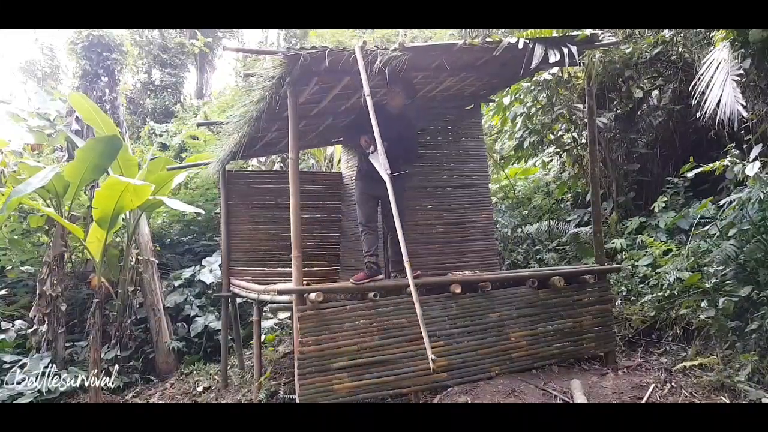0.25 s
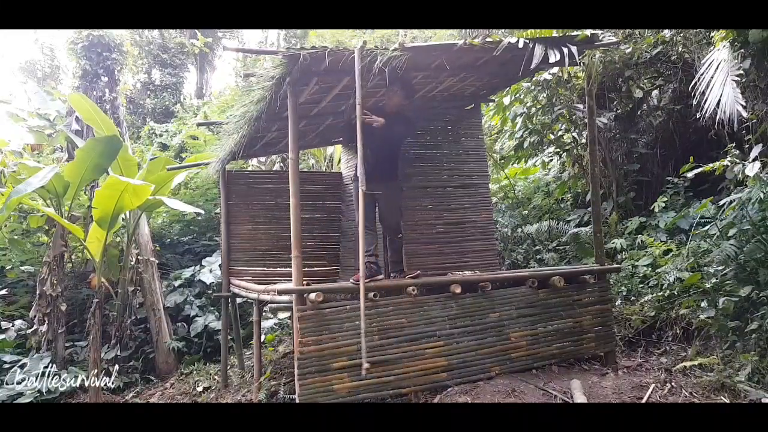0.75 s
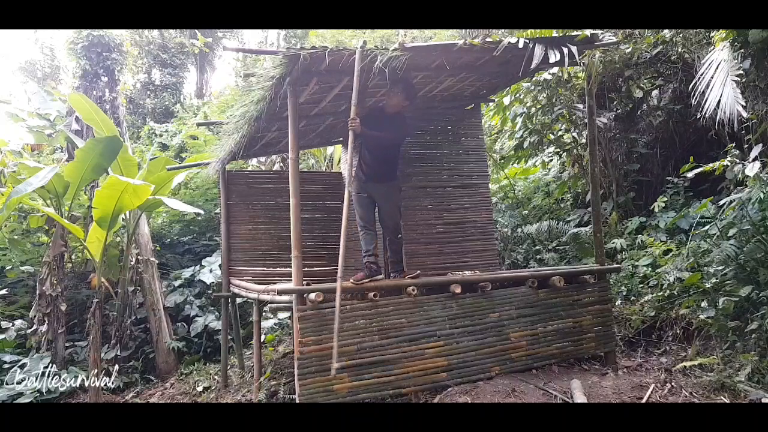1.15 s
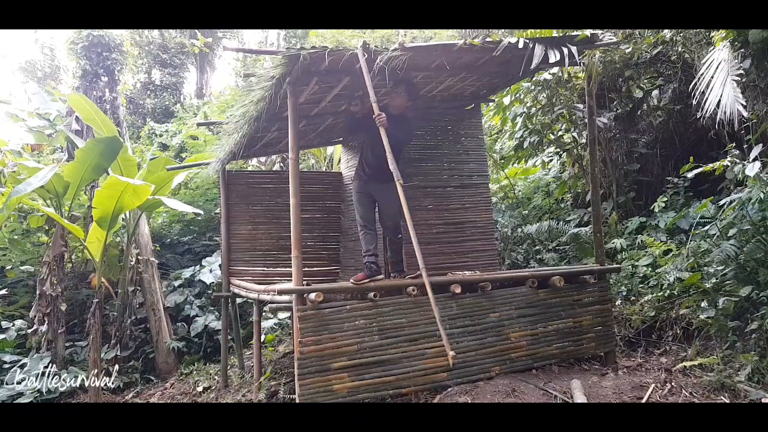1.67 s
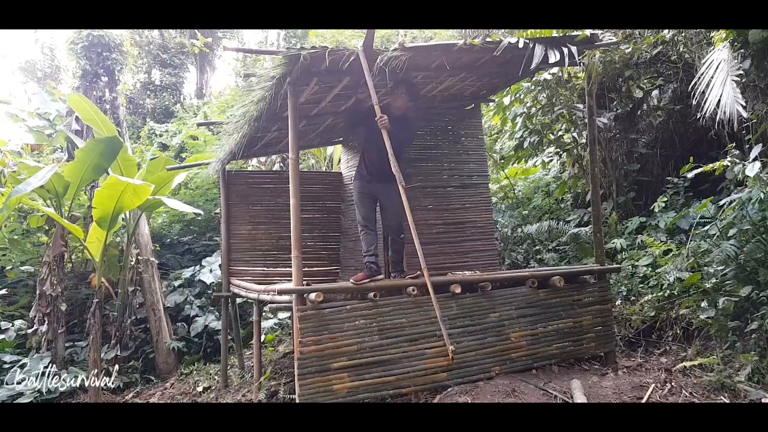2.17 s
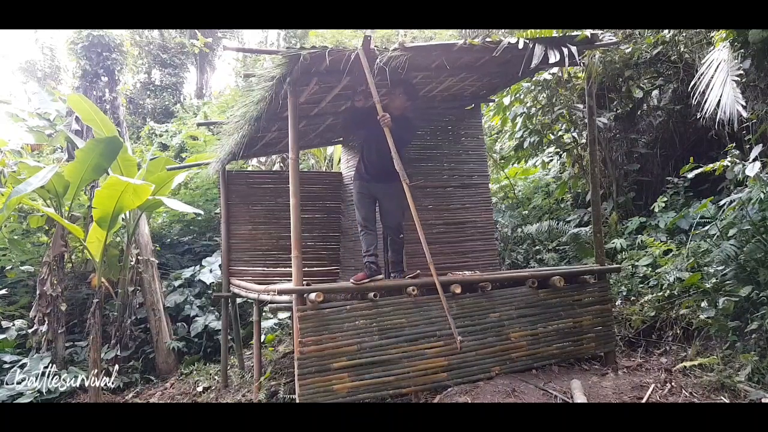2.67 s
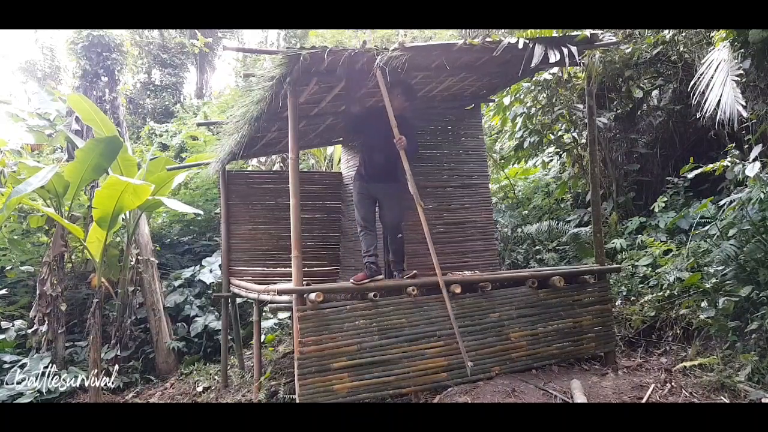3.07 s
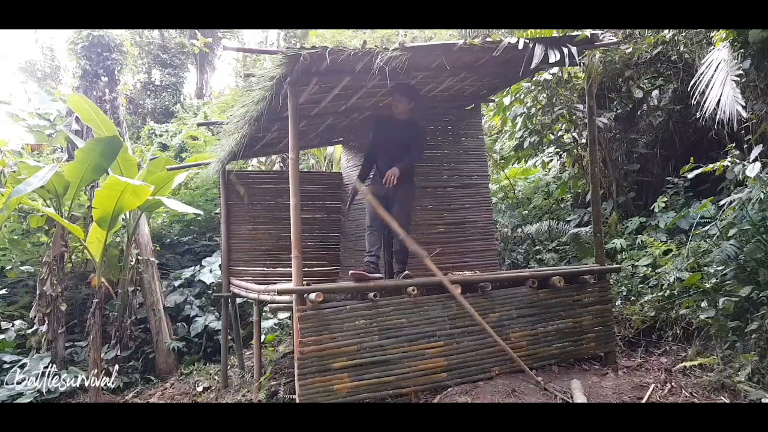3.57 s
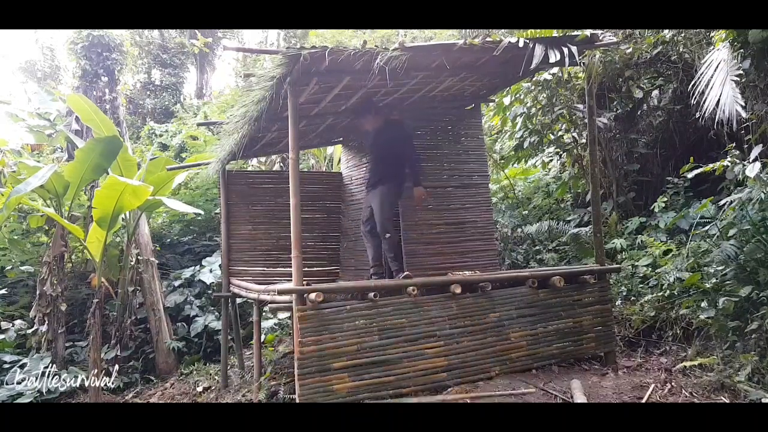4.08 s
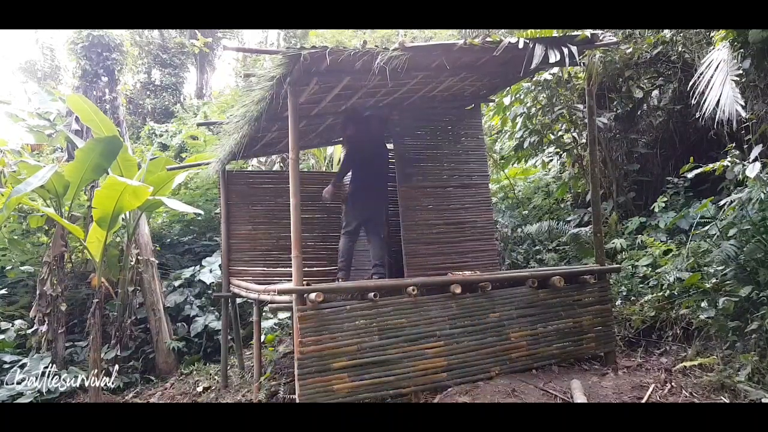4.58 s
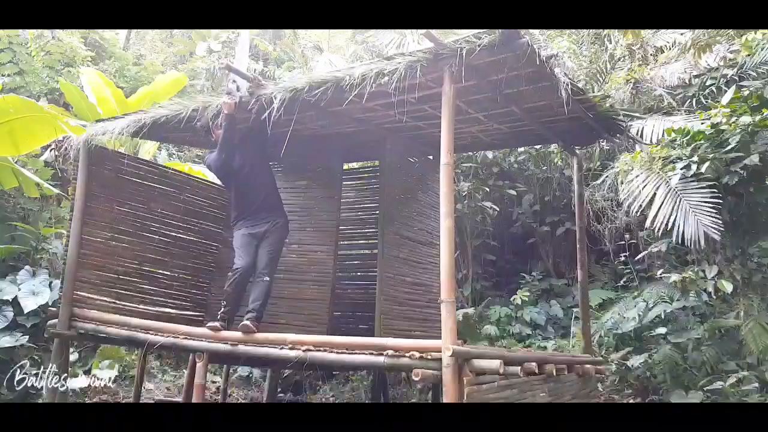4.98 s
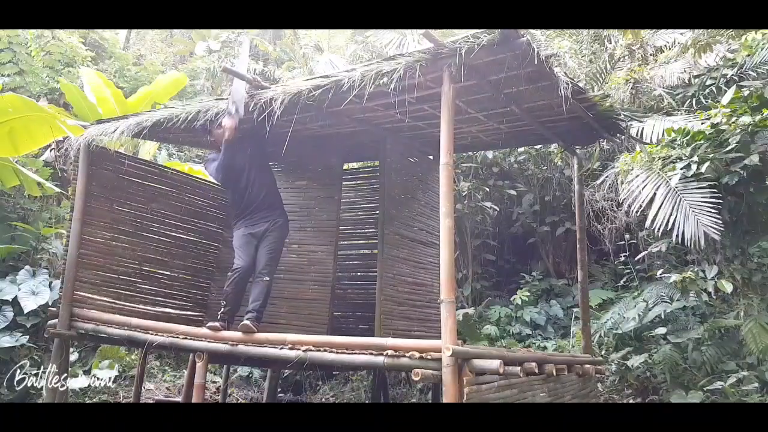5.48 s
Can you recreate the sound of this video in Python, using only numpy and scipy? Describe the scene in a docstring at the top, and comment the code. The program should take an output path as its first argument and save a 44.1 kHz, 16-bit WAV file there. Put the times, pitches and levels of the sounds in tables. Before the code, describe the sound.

Faint scrapes of a bamboo pole, then a loud clattering crack as it drops, followed by slat knocks, creaks and soft shuffling steps in a forest.

```python
"""A bamboo hut in a forest: a person scrapes a long pole along the wall, lets it fall and steps on slats.
Blows and rubbing are shaped noise forced through the resonances of the canes, with decaying modes on blows.
Lashings creak by stick-slip, fibres snap as short clicks, hollow canes hoot and low tones thump dully.
Filtered noise makes the air, a far drone and the insects; birds are falling whistles over a far flock.
Decaying noise is the trees' short echo of all but the thumps and the forest."""
import sys
import numpy as np
from scipy import signal
from scipy.fft import rfft, irfft, next_fast_len
from scipy.io import wavfile
from scipy.ndimage import uniform_filter1d, map_coordinates

SR = 44100
rng = np.random.default_rng(int(sys.argv[2]) if len(sys.argv) > 2 else 0)


def int16_out(signal):
    """Quantize to a 16-bit WAV file."""
    q = np.round(np.clip(np.atleast_2d(signal).T, -1, 1) * 32767)
    wavfile.write(sys.argv[1], SR, q.astype(np.int16))


N = 253134
T = np.arange(N) / SR

# Levels are in dB; some sources add a trim or balance to theirs.
# air of the forest: (frequency [Hz], level per Hz [dB])
AIR_SPECTRUM = [(20, -5), (45, 3), (95, -1), (200, -10), (440, -12.5), (1200, -14.5), (3300, -12.5),
                (4600, -9.5), (5300, -10.5), (6500, -8.5), (8100, -17.5), (14400, -16.5), (16000, -46)]
# insect chorus: (frequency [Hz], level per Hz [dB])
CHORUS_SPECTRUM = [(2060, -45), (3500, -42), (3910, -5.5), (4160, -3), (4500, -7), (5000, 5.5), (5330, 11),
                   (5650, -2), (6130, 0), (6560, 3), (7500, -80), (9750, -58), (16500, -120)]
# a lower insect: (time [s], level [dB])
TRILL_LEVEL = [(0, -105), (1.35, -78.5), (1.45, -75), (2.1, -66), (2.4, -69.5), (3.1, -72), (3.4, -89),
               (5.7, -57)]
# a higher insect: (time [s], level [dB])
WHINE_LEVEL = [(0, -109), (.5, -83), (1.15, -75), (1.3, -87), (1.8, -76.5), (3.3, -82), (3.9, -74.5),
               (5.7, -83)]
# a faint far drone: (time [s], level [dB])
DRONE_LEVEL = [(0, -72.5), (.7, -80.5), (1.1, -76), (1.5, -87.5), (5.7, -73)]
# a bird's falling chips: (time [s], level [dB])
CHIPS = [(.338, -54.5), (.402, -58.5), (.965, -57), (1.485, -54), (1.525, -51), (2.733, -49),
         (3.851, -55.5)]
# a farther bird twitters down the scale: (start [s], length [s], mean first pitch [Hz], level [dB])
TWITTERS = [(.15, 0.23, 5800, -70), (1.15, .25, 5920, -65.5), (1.655, 0.22, 5760, -61.5),
            (3.273, 0.12, 5360, -66)]
# echo of the trees: (frequency [Hz], t60 [s])
TREE_DECAY = [(100, 0.74), (500, 0.5), (2500, 0.52), (6000, 0.64), (14000, 0.59)]
# likeness of left and right: (frequency [Hz], correlation [-1 to 1])
EAR_LIKENESS = [(40, 0.32), (150, 1), (450, 0.89), (1000, 0.59), (2100, 0.33), (4500, 0.065),
                (10000, -0.017)]

# the pole strikes: (time [s], body [dB], clack [dB], splinter [dB], clatter t60 [s])
POLE_STRIKES = [(.738, -80, -83, -74, 0.38), (1.014, -55.5, -42, -40, 0.14), (1.025, -53.5, -48, -48, 0.25),
                (1.939, -67, -56, -52, 0.094), (1.955, -71, -58, -61, 0.23), (2.373, -56, -40, -36.5, 0.14),
                (2.444, -51, -42, -50, 0.14), (2.623, -56, -48.5, -39.5, 0.53),
                (2.783, -66, -46, -32, 0.11), (4.006, -39, -37, -37, 0.16),
                (4.0225, -13, -21.5, -22.5, 0.084), (4.032, -25.5, -14, -15.5, 0.094),
                (4.041, -29.5, -28.5, -21.5, 0.28)]
# slats knock on the joists: (time [s], body [dB], clack [dB], splinter [dB], clatter t60 [s])
SLAT_KNOCKS = [(4.6515, -25.5, -25, -20, 0.24), (4.6555, -22.5, -13.5, -39, 0.061),
               (4.668, -20, -22, -31, 0.14), (4.8445, -21.5, -26, -29.5, 0.1),
               (4.9595, -67, -58, -34, 0.047), (4.973, -26.5, -23.5, -54, 0.032),
               (5.016, -30, -41, -58, 0.22)]
# feet land on the sagging floor: (time [s], body [dB], clack [dB], splinter [dB], clatter t60 [s])
STEPS = [(5.137, -32, -40, -39, 0.12), (5.243, -59, -32.5, -45, 0.14), (5.345, -30.5, -54, -49, 0.1),
         (5.372, -48, -56, -58, 0.059), (5.415, -33.5, -39, -46, 0.38), (5.608, -35, -33, -48, 0.094),
         (5.728, -38, -43, -51, 0.18)]
# strokes of the pole along the wall: (start [s], length [s], body [dB], clack [dB], splinter [dB])
SCRAPES = [(.742, 0.024, -69, -57.5, -68), (1.715, 0.034, -63, -59, -80),
           (1.955, 0.044, -34.5, -38.5, -45.5), (2.015, 0.023, -31.5, -36.5, -40.5),
           (2.226, 0.0085, -54, -48.5, -64), (2.27, .06, -61, -53, -61), (2.38, 0.061, -39.5, -42.5, -48.5),
           (2.627, 0.036, -55.5, -51, -53), (2.79, 0.036, -27, -30.5, -36.5),
           (2.925, 0.0083, -44.5, -59, -73), (3.17, 0.063, -72, -72.5, -61.5),
           (3.59, 0.014, -69, -61, -58.5)]
# slats rub under the feet: (start [s], length [s], body [dB], clack [dB], splinter [dB])
SHUFFLES = [(4.456, 0.0042, -76, -49, -53), (4.49, .13, -69, -82, -65), (4.87, 0.11, -56.5, -46.5, -47.5),
            (5.112, 0.019, -39, -39, -44), (5.18, 0.1, -42, -41.5, -41.5), (5.29, 0.068, -41.5, -43.5, -47),
            (5.497, 0.093, -40.5, -37.5, -32), (5.6, 0.055, -43, -42, -74)]
# the air in a hollow cane rings: (time [s], pitch [Hz], level [dB], t60 [s])
HOLLOW_TONES = [(.762, 598, -51, .36), (.742, 1170, -65, .4), (1.295, 330, -65, .2), (2.665, 590, -40, .26),
                (2.668, 760, -46, .2), (2.93, 470, -54, .75), (4.846, 388, -29, .09),
                (5.019, 425, -29, .11)]
# dull low thumps: (time [s], level [dB], left minus right [dB])
THUMPS = [(1.146, -59, 29), (2.421, -56.5, 11), (2.546, -71, 7), (2.802, -50, 7), (3.149, -58.5, 20),
          (3.448, -63, 22), (3.583, -59, 16.5), (3.832, -65.5, 17), (4.039, -52.5, 2), (4.651, -57.5, 2),
          (5.104, -49.5, -1), (5.332, -47, 0), (5.45, -64, -5)]
# dry fibres snap: (time [s], peak level [dB])
SNAPS = [(4.033, -10), (4.0405, -10), (4.6515, -14), (4.8453, -14.5), (4.904, -26), (4.9598, -19.5),
         (5.1125, -26), (5.486, -30), (5.4945, -23), (5.5005, -24)]
# a lashing creaks in a run of slips: (start [s], length [s], first peak [dB], last peak [dB])
CREAKS = [(4.121, 0.059, -23.5, -15.5), (4.217, .015, -27.5, -25), (4.286, .08, -34, -32.5),
          (4.414, 0.047, -42.5, -30.5), (4.498, .14, -32, -35), (4.75, .015, -35, -30),
          (4.921, .015, -32, -39), (4.968, .015, -24, -23)]

# ringing modes of the pole: (frequency [Hz], level [dB], t60 [s])
POLE_MODES = [(380, -8, .45), (510, -1, .35), (604, 3, .16), (684, -10, .2), (985, 1, .12), (1155, 2, .16),
              (1305, 0, .18), (1790, -9, .2), (2210, -13, .3), (2325, -9, .28), (3460, -15, .22)]
# ringing modes of the slats: (frequency [Hz], level [dB], t60 [s])
SLAT_MODES = [(260.6, -22.5, 0.6), (396, -13.5, 0.24), (503, -18, 0.18), (737, -20, 0.14),
              (839, -15.5, 0.18), (1001, -8.5, 0.11), (1237, -16, 0.097), (1220, -21, 0.067),
              (1440, -28, 0.13), (1497, -1, 0.039), (1590, -11.5, 0.12), (2320, -36, 0.16),
              (2260, -36, 0.12), (2670, -41, 0.15), (3120, -29, 0.4), (3400, -21, 0.22)]
# ringing modes of the sagging floor: (frequency [Hz], level [dB], t60 [s])
FLOOR_MODES = [(204, -0.5, 0.09), (237, 0, 0.09), (417, -0.5, 0.061)]
# broad resonances of the pole: (frequency [Hz], width [Hz], level [dB])
POLE_BODY = [(234, 360, -22.5), (332, 66, -10), (498, 70, -5), (644, 44, -20), (702, 30, -1),
             (1000, 300, 0.5), (1100, 87, 1), (1490, 100, 2.5), (1766, 35, 4.5), (1940, 120, -1),
             (2444, 194, 3)]
# broad resonances of the slats: (frequency [Hz], width [Hz], level [dB])
SLAT_BODY = [(340, 76, -15), (508, 24, -4), (690, 79, -12.5), (810, 21, -0.5), (918, 47, 1.5),
             (1160, 22, 4), (1410, 70, -0.5), (1960, 54, -2.5), (2133, 130, -3), (2420, 110, -5)]
# broad resonances of the wall: (frequency [Hz], width [Hz], level [dB])
WALL_BODY = [(178, 290, -3.5), (263, 23, 5.5), (328, 15, 8.5), (428, 9.1, 9), (590, 12, 1.5),
             (810, 17, 12.5), (1060, 330, 3.5), (1260, 200, 7.5), (1800, 1100, 6.5), (2190, 200, 7.5)]
# broad resonances of the floor: (frequency [Hz], width [Hz], level [dB])
FLOOR_BODY = [(137, 100, -2), (213, 44, 3.5), (404, 35, 3), (574, 45, -1), (800, 65, 3), (1130, 510, 1.5),
              (1510, 310, -2), (1920, 460, 1), (2320, 88, 5.5), (3330, 710, -2)]
# treble of pole and slat blows: (frequency [Hz], level per Hz [dB])
CRACK_SPECTRUM = [(1470, -25), (2500, 7), (3080, -3), (3830, -2.5), (7950, -11), (10300, -9.5),
                  (12100, -12.5), (14700, -17), (16000, -32)]
# treble of the pole on the wall: (frequency [Hz], level per Hz [dB])
WALL_RASP = [(1470, -5), (2500, 3.5), (3330, -8), (3690, -5), (6600, -9), (8080, -14), (11000, -7.5),
             (14900, -12.5), (16000, -6.5)]
# treble of steps and rubbing on the floor: (frequency [Hz], level per Hz [dB])
FLOOR_RASP = [(1470, -37), (2500, -8), (3770, -4.5), (4620, -1.5), (6860, -2.5), (9890, -9.5), (10800, -3),
              (12600, -6), (14800, -6.5), (16000, -3.5)]
# flutter within a thump: (frequency [Hz], level per Hz [dB])
FLUTTER_SPECTRUM = [(20, -10), (50, 14), (110, -1), (200, -21.5), (400, -25.5), (1000, -70), (3000, -120)]
# a snapping fibre: (frequency [Hz], level per Hz [dB])
SNAP_SPECTRUM = [(500, -3.5), (2000, -7), (5000, -6.5), (9000, -8.5), (14000, -4), (16000, -7)]
# the tick of a lashing: (frequency [Hz], level per Hz [dB])
TICK_SPECTRUM = [(300, -8.5), (900, -8.5), (1600, 2.5), (2500, 2.5), (3600, -5.5), (6000, -15), (9000, -22),
                 (15000, -20)]

BODY_HZ, CLACK_HZ = 700, 3000  # upper edges of the body and clack bands
BODY_LAG_S = 0.014  # the heavy frame answers a stroke later than the surface does
SLIP_S, AFTERSLIP_DB = 0.033, -11  # one slip to the next; the weaker slip halfway between two
REBOUND_S, REBOUND_DB = 0.061, -7  # each thump comes again, softer
CHIP_FROM_HZ, CHIP_TO_HZ = 5620, 4770
TWITTER_FALL_HZ_PER_S = 2110
TOP_HZ = 15750  # band limit of the whole sound


def amp(db):
    """Level is logarithmic: decibels become an amplitude ratio."""
    return 10 ** (np.asarray(db) / 20)


def unit(x):
    """Normalise the power: the centre of the stereo image gets rms 1."""
    return x / np.sqrt(np.mean(np.atleast_2d(x).mean(0) ** 2) + 1e-20)


def along(points, hz):
    """Interpolate a curve of frequency on a logarithmic axis."""
    f, v = np.transpose(points)
    return np.interp(np.log(hz + 1), np.log(f + 1), v)


def over_time(points):
    """Interpolate a level curve in time."""
    return np.interp(T, *np.transpose(points))


def wobble(rate):
    """Slow random modulation: a smooth curve through rate random knots a second."""
    return map_coordinates(rng.standard_normal(int(N * rate / SR) + 4), [T * rate])


def filtered(x, response):
    """Linear filtering: the spectrum is multiplied by a complex frequency response."""
    m = next_fast_len(x.shape[-1] + 8192)
    spectrum = rfft(x, m) * response(np.fft.rfftfreq(m, 1 / SR))
    return irfft(spectrum, m)[..., :x.shape[-1]]


def coloured(x, points):
    """Spectral shaping: x takes the level curve given in dB per Hz."""
    return filtered(x, lambda hz: amp(along(points, hz)))


def add(track, s, x):
    """Superposition: x is summed into the track at time s."""
    part = track[..., max(round(s * SR), 0):][..., :x.shape[-1]]
    part += x[..., :part.shape[-1]]


def noise():
    """White noise: two unrelated random signals of flat spectrum."""
    return rng.standard_normal((2, N))


def spread(pair):
    """Interaural coherence: mid and side are weighted so that likeness depends on frequency."""
    def mid_side_gains(hz):
        turn = np.arccos(np.clip(along(EAR_LIKENESS, hz), -1, 1)) / 2
        return np.array([np.cos(turn), np.sin(turn)])
    mid, side = filtered(pair, mid_side_gains)
    return np.array([mid + side, mid - side])


def from_left(x, lead_ms):
    """Time difference between the ears: sound from the left reaches the left side first."""
    sides = np.array([[1], [-1]])
    return filtered(x, lambda hz: np.exp(1j * np.pi * hz * lead_ms / 1000 * sides))


def narrow(centre_hz, width_hz):
    """Resonant filtering: noise in a narrow band is heard as a hazy pitch."""
    return unit(filtered(noise(), lambda hz: 1 / (1 + ((hz - centre_hz) / width_hz) ** 2)))


def forest():
    """Filtered noise sources: air, a fluttering insect chorus, trill and whine, and a far drone."""
    air = amp(-71) * unit(coloured(spread(noise()), AIR_SPECTRUM))
    chorus = unit(coloured(noise(), CHORUS_SPECTRUM))
    chorus *= amp(-73.5 + 0.5 * wobble(6.67) + 0.81 * wobble(72))
    trill = narrow(4240, 320) * amp(over_time(TRILL_LEVEL) + 1.0 * wobble(50))
    whine = narrow(9100, 290) * amp(over_time(WHINE_LEVEL))
    drone = (narrow(658, 30) + narrow(1410, 110)) * amp(over_time(DRONE_LEVEL) - 9)
    return air + (chorus + trill) * amp([[-1], [1]]) + whine + drone


def birds(far_db, length=0.029, count=320, note_s=0.014, scatter_hz=260):
    """Frequency glides: chips and twitters are quick falling whistles; a far flock holds its pitches."""
    out, t = np.zeros((2, N)), T[:int(length * SR)]
    when, size, high = rng.random((count, 3)).T
    at = (when * N).astype(int)
    flock_hz = 5000 + 950 * high + 140 * wobble(4.0)[at]
    flock_db = far_db + 5 * size + 3 * wobble(5.1)[at]  # the flock comes in waves
    flock = np.column_stack([at / SR, flock_hz, flock_hz, flock_db])
    notes = [(s, CHIP_FROM_HZ, CHIP_TO_HZ, db) for s, db in CHIPS]
    for start, phrase_s, first_hz, db in TWITTERS:
        for s in np.arange(0, phrase_s, note_s):
            hz = first_hz - TWITTER_FALL_HZ_PER_S * s + rng.normal(0, scatter_hz)
            notes.append((start + s, hz, hz - TWITTER_FALL_HZ_PER_S * length, db))
    for s, start_hz, end_hz, db in np.vstack([notes, flock]):
        pitch = start_hz + (end_hz - start_hz) * (t / length) ** 1.18
        ear_phase = rng.normal(0, 1.0, (2, 1))
        whistle = np.sin(2 * np.pi * np.cumsum(pitch) / SR + ear_phase)
        add(out, s, amp(db) * np.sin(np.pi * t / length) * whistle)
    return out * amp([[-2], [2]])


def echo(x):
    """Diffuse scattering: the trees return decaying noise, each frequency dying at its own speed."""
    hz, t, z = signal.stft(spread(noise())[:, :SR], SR, nperseg=256)
    decay = amp(-60 * t / along(TREE_DECAY, hz)[:, None])
    build_up = 1 - np.exp(-t / 0.012)
    tail = signal.istft(z * decay * build_up, SR, nperseg=256)[1]
    return signal.fftconvolve(x, tail / np.linalg.norm(tail[0]), axes=1)[:, :N]


def patchy(x, depth_db):
    """Wandering contact: the contact point moves, so narrow bands swell and fade by turns."""
    z = signal.stft(x, nperseg=512)[2]
    field = uniform_filter1d(rng.standard_normal(z.shape[1:]), 3, axis=0)
    field = uniform_filter1d(field, 4, axis=1)
    return signal.istft(z * amp(depth_db * field / field.std()), nperseg=512)[1][:, :N]


def bamboo(force, resonances, treble):
    """Forced resonance: force drives the canes into body, clack and splinter bands, each of rms 1."""
    pair = spread(force)

    def wood_response(f):
        # the canes are not in step, so their resonances add in power
        power = sum(np.abs(amp(db) * f * w / (c * c - f * f + 1j * f * w)) ** 2
                    for c, w, db in resonances)
        return np.sqrt(power)

    def below(hz, edge_hz, order=12):
        return 1 / np.sqrt(1 + (hz / edge_hz) ** order)

    def above(hz, edge_hz):
        return np.sqrt(1 - below(hz, edge_hz) ** 2)

    wood = filtered(pair, wood_response)
    body = filtered(wood, lambda hz: below(hz, BODY_HZ))
    # 1j is a quarter turn of phase against the body
    clack = filtered(wood, lambda hz: 1j * above(hz, BODY_HZ) * below(hz, CLACK_HZ))
    splinter = filtered(pair, lambda hz: amp(along(treble, hz)) * above(hz, CLACK_HZ))
    return unit(body), unit(clack), unit(splinter)


def blows(rows, resonances, treble, modes, body_db, clack_db, splinter_db, ring_db, treble_life):
    """Impact excitation: a blow sets loose canes clattering and leaves the struck one ringing."""
    out, t = np.zeros((2, N)), T[:SR * 3 // 4]
    bands = bamboo(patchy(noise(), depth_db=2.5), resonances, treble)
    body, clack, splinter = (np.pad(band, ((0, 0), (0, SR))) for band in bands)
    hz, mode_db, life = np.transpose(modes)[:, :, None]
    for s, low, mid, high, t60 in rows:
        now = slice(round(s * SR), round(s * SR) + len(t))
        fade_db = -60 * t / max(t60, 0.01)
        hit = body[:, now] * amp(low + body_db + fade_db) * (1 - np.exp(-t / 0.006))
        hit += clack[:, now] * amp(mid + clack_db + fade_db)
        hit += splinter[:, now] * amp(high + splinter_db + fade_db / treble_life)
        ring_level = amp(mode_db + rng.normal(0, 0.56, hz.shape) - 60 * t / life)
        ring = ring_level * np.sin(2 * np.pi * (hz * t + rng.random(hz.shape)))
        attack = 1 - np.exp(-t / 0.00043)
        add(out, s, (hit + amp(low + ring_db) * ring.sum(0)) * attack)
    return out


def smeared(x, smear_ms):
    """Dispersion: each pitch takes its own time along the canes, which blurs a sharp slip."""
    knots = rng.standard_normal(1000)

    def phase(hz):
        return np.pi * map_coordinates(knots, [hz * smear_ms / 1000], mode="mirror")
    return filtered(x, lambda hz: np.exp(1j * phase(hz)))


def rubbing(strokes, resonances, treble, slip_rate, scatter_db, patchy_db, body_db, clack_db,
            splinter_db, swell_db, attack_s, release_t60):
    """Dry friction: dense uneven slips excite the canes; a stroke grips, swells and lets go."""
    slips = noise() * (rng.random(N) < slip_rate / SR) * amp(scatter_db * rng.standard_normal(N))
    bands = bamboo(patchy(smeared(slips, smear_ms=2.3), patchy_db), resonances, treble)
    trims, lags = (body_db, clack_db, splinter_db), (BODY_LAG_S, 0, 0)
    out = np.zeros((2, N))
    t = T[:SR] - attack_s
    grip = np.clip(1 + t / attack_s, 0, 1)
    for band, levels, trim, lag in zip(bands, np.transpose(strokes)[2:], trims, lags):
        power = np.zeros(N)
        for (start, length, *_), level in zip(strokes, levels):
            press_db = np.interp(t, [0, length], [-swell_db, 0])
            press_db -= 60 * np.maximum(t - length, 0) / release_t60
            add(power, start + lag - attack_s, (grip * amp(level + trim + press_db)) ** 2)
        out += band * np.sqrt(power)
    return out


def hollows(octave_db=-14):
    """Air-column resonance: an open cane hoots briefly and hoarsely, with a weak octave."""
    out, t = np.zeros(N), T[:SR]
    for s, hz, db, t60 in HOLLOW_TONES:
        turn = 2 * np.pi * hz * t + 0.6 * wobble(90)[:SR]  # unsteady phase is the hoarseness
        tone = np.sin(turn) + amp(octave_db) * np.sin(2 * turn)
        add(out, s, amp(db - 60 * t / t60) * (1 - np.exp(-t / 0.0027)) * tone)
    return out * amp(0.32 * wobble(35.6))


def thumps(pitch_hz, t60, db, flutter_db):
    """Damped oscillation: a few low cycles flutter softly; the deepest part differs between the ears."""
    out, t = np.zeros((2, N)), T[:SR // 2]
    flutter = unit(coloured(spread(noise()), FLUTTER_SPECTRUM))
    flutter = np.pad(flutter, ((0, 0), (0, SR)))
    rows = [(s + k * REBOUND_S, level_db + k * REBOUND_DB, pan_db)
            for s, level_db, pan_db in THUMPS for k in range(2)]
    swell = (1 - np.exp(-t / 0.0065)) ** 2 * amp(-60 * t / t60)
    for (s, level_db, pan_db), detune in zip(rows, rng.standard_normal(len(rows))):
        turn = 2 * np.pi * pitch_hz * np.exp(0.11 * detune) * t
        deepest = 0.46 * np.sin(0.638 * turn + 2 * np.pi * rng.random((2, 1)))
        wave = np.sin(turn) + deepest
        wave += amp(flutter_db) * flutter[:, round(s * SR):][:, :len(t)]
        add(out, s, amp(level_db + db + pan_db * np.array([[.5], [-.5]])) * swell * wave)
    return out


def clicks(rows, spectrum, t60, rattle_db, rattle_t60, attack_s):
    """Sudden release: sharp clicks are scaled to their peaks, each with a faint rattle after it."""
    out, t = np.zeros((2, N)), T[:SR // 10]
    grain = coloured(spread(noise()), spectrum)
    decay = amp(-60 * t / t60) + amp(rattle_db - 60 * t / rattle_t60)
    shape = (1 - np.exp(-t / attack_s)) * decay
    for s, db in rows:
        click = grain[:, round(s * SR):][:, :len(t)] * shape
        add(out, s, amp(db) * click / np.abs(click).max())
    return out


def stick_slip(scatter_db):
    """Stick-slip: a strained lashing slips at a steady beat, strong and weak by turns."""
    rows = []  # (time [s], level [dB])
    for start, length, first_db, last_db in CREAKS:
        for s in np.arange(0, max(length, SLIP_S / 2), SLIP_S):
            db = np.interp(s, [0, length], [first_db, last_db]) + rng.normal(0, scatter_db, 2)
            rows += [(start + s, db[0]), (start + s + SLIP_S / 2, db[1] + AFTERSLIP_DB)]
    return rows


def scene():
    """Superposition of direct sounds, their echo, the thumps and the forest."""
    pole = blows(POLE_STRIKES, POLE_BODY, CRACK_SPECTRUM, POLE_MODES, body_db=2, clack_db=-2,
                 splinter_db=-10.5, ring_db=-10.5, treble_life=1.0)
    scrapes = rubbing(SCRAPES, WALL_BODY, WALL_RASP, slip_rate=3500, scatter_db=1, patchy_db=1.5,
                      body_db=-4.0, clack_db=-2, splinter_db=4,
                      swell_db=6, attack_s=0.025, release_t60=0.22)
    snaps = clicks(SNAPS, SNAP_SPECTRUM, t60=0.015, rattle_db=-17, rattle_t60=0.033, attack_s=0.00005)
    creaks = amp(1.5) * clicks(stick_slip(scatter_db=1.1), TICK_SPECTRUM, t60=0.014,
                               rattle_db=-19.5, rattle_t60=0.097, attack_s=0.0003)
    shuffles = rubbing(SHUFFLES, FLOOR_BODY, FLOOR_RASP, slip_rate=5600, scatter_db=3.0, patchy_db=2.0,
                       body_db=0.0, clack_db=-1.0, splinter_db=-0.6,
                       swell_db=4.5, attack_s=0.018, release_t60=0.24)
    knocks = blows(SLAT_KNOCKS, SLAT_BODY, CRACK_SPECTRUM, SLAT_MODES, body_db=-2.5, clack_db=-4.5,
                   splinter_db=-8, ring_db=-2.0, treble_life=1.0)
    steps = blows(STEPS, FLOOR_BODY, FLOOR_RASP, FLOOR_MODES, body_db=-4.5, clack_db=-3.5,
                  splinter_db=-7.0, ring_db=-2, treble_life=1.0)
    struck = from_left(pole + knocks + snaps, lead_ms=0.1)
    rubbed = scrapes + from_left(shuffles + steps, lead_ms=0.07)
    small = creaks + hollows() + birds(far_db=-73)
    wet = echo(amp(-13.5) * struck + amp(-11) * rubbed + amp(-6.0) * small)
    low = thumps(pitch_hz=71.7, t60=0.38, db=7.0, flutter_db=-3.5)
    return struck + rubbed + small + wet + low + forest()


def record(dry):
    """Saturation and band limiting: the highest peaks are rounded off and the top is cut steeply."""
    rounded = dry / (1 + np.abs(dry / .85) ** 6) ** (1 / 6)
    return filtered(rounded, lambda hz: 1 / np.sqrt(1 + (hz / TOP_HZ) ** 240))


dry = scene()
out = record(dry)
int16_out(out)
```